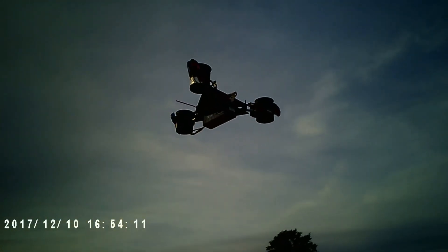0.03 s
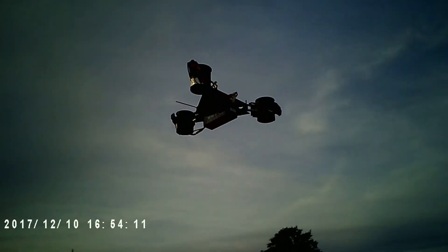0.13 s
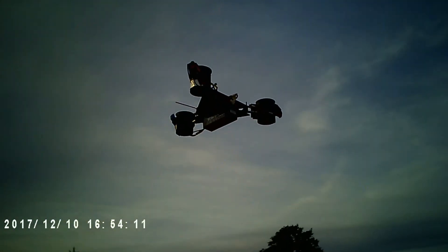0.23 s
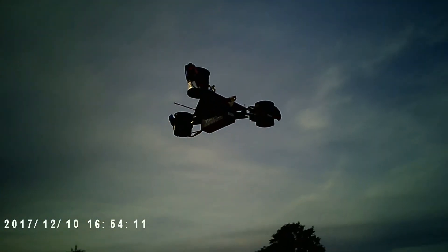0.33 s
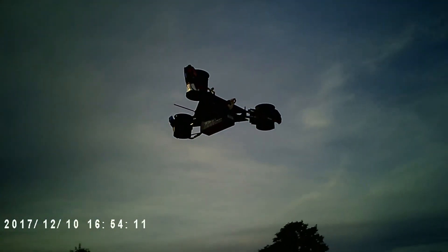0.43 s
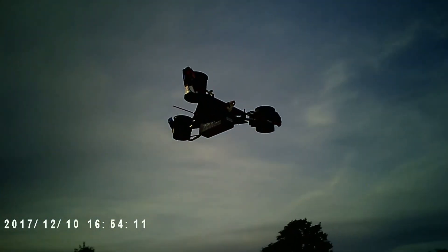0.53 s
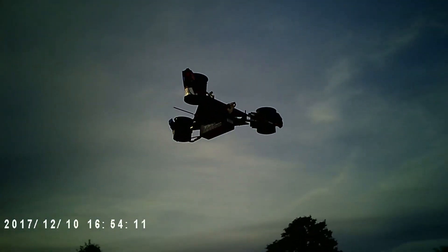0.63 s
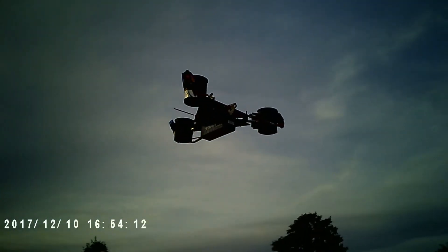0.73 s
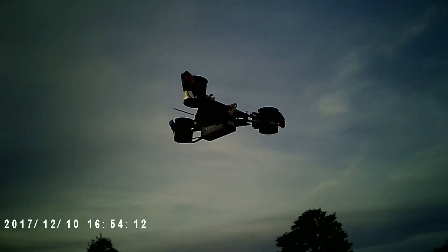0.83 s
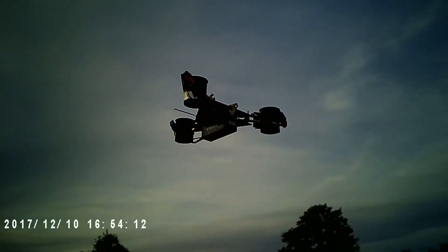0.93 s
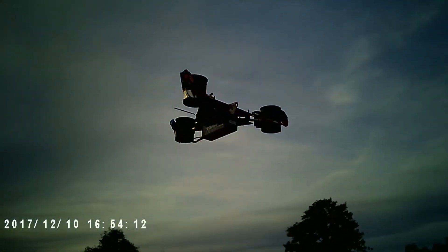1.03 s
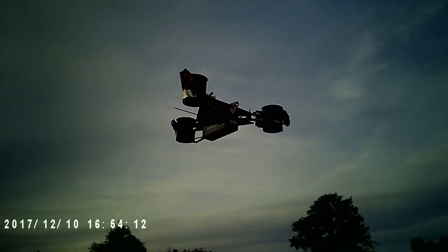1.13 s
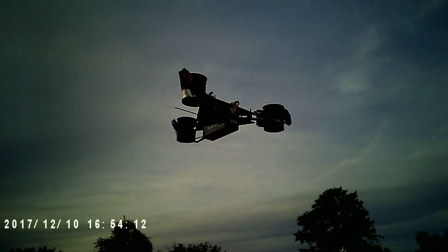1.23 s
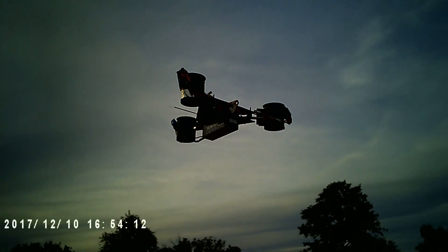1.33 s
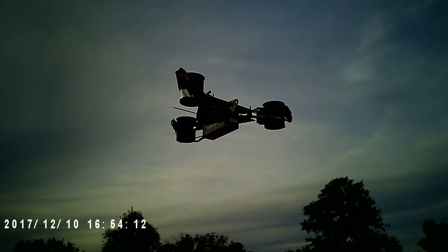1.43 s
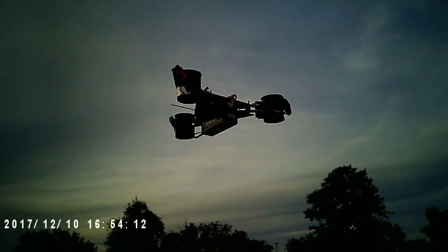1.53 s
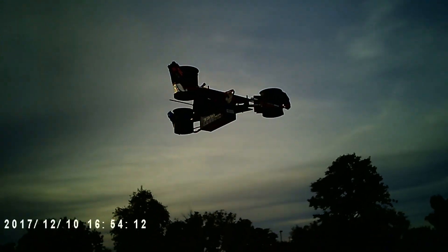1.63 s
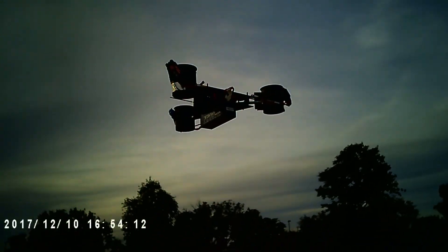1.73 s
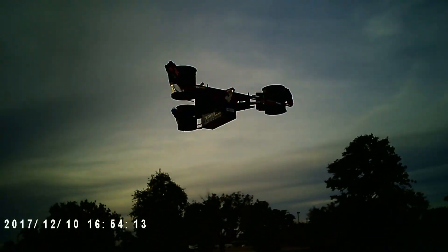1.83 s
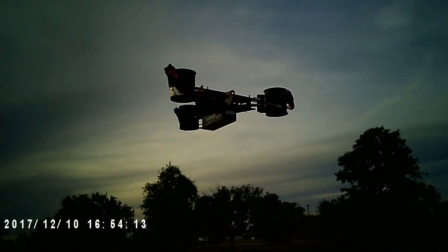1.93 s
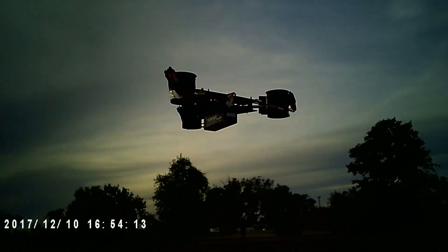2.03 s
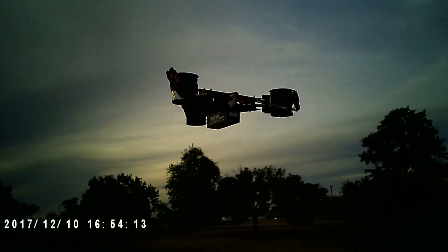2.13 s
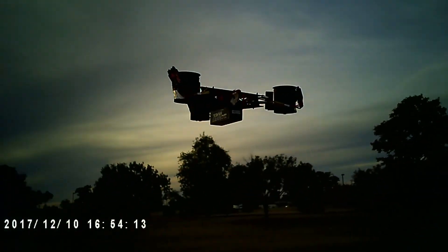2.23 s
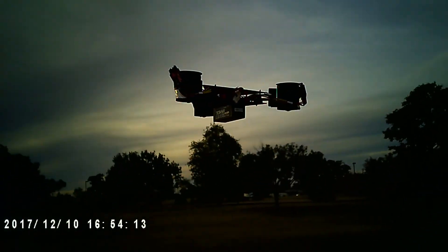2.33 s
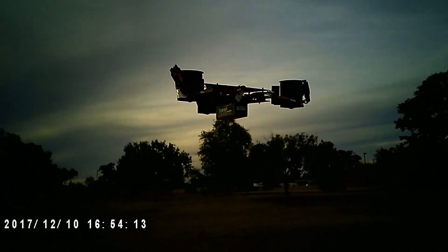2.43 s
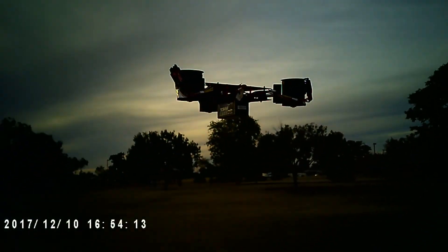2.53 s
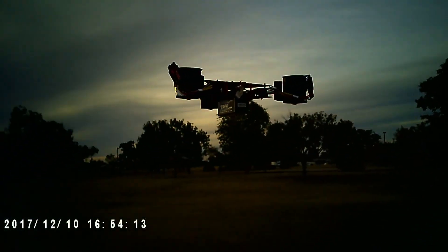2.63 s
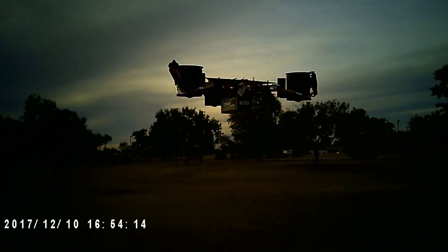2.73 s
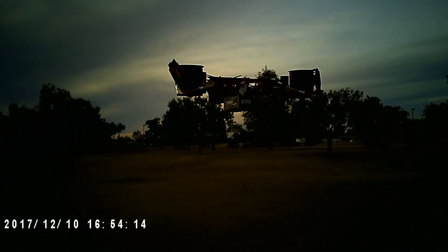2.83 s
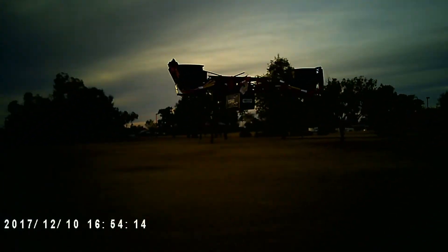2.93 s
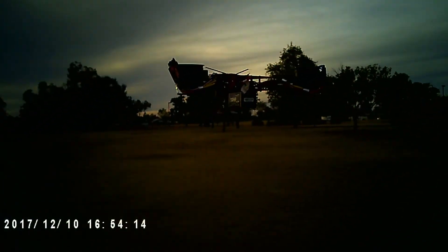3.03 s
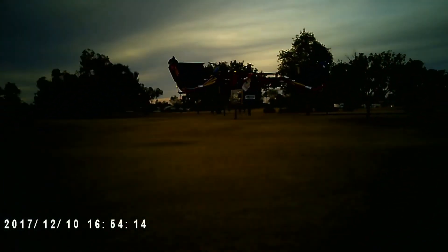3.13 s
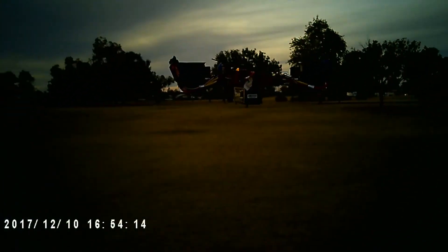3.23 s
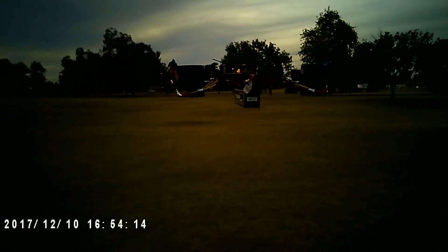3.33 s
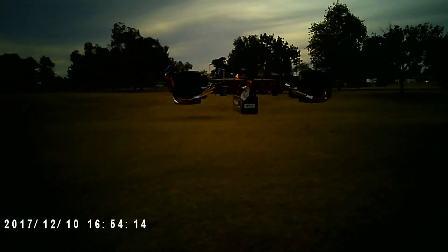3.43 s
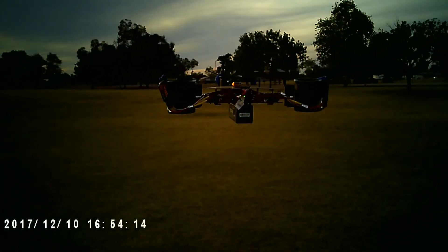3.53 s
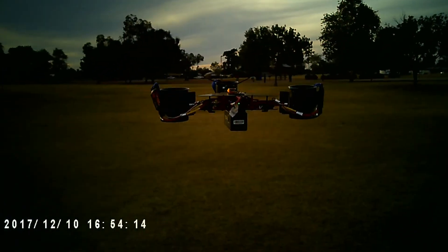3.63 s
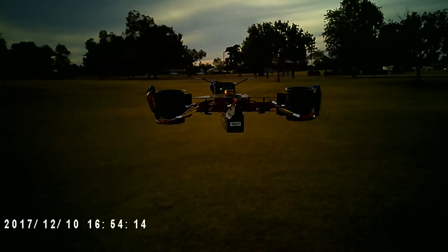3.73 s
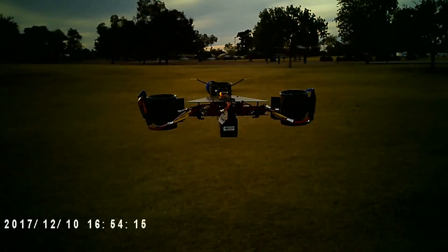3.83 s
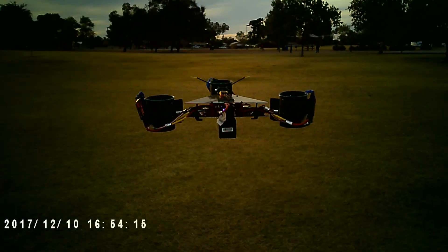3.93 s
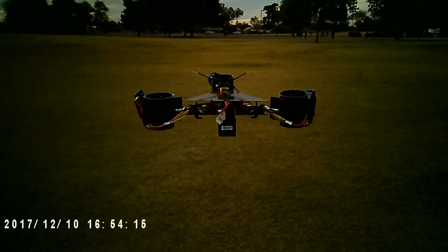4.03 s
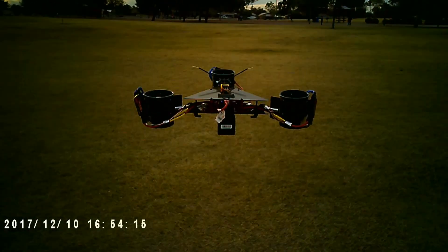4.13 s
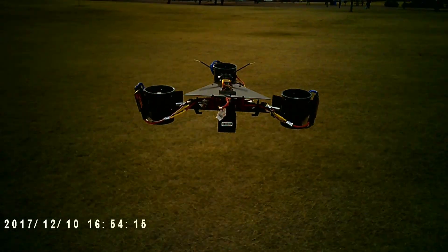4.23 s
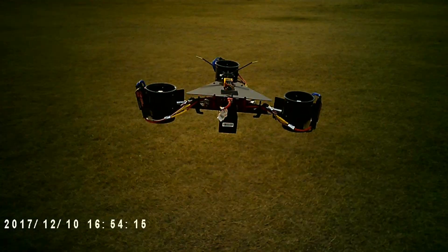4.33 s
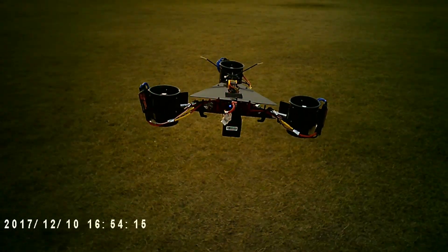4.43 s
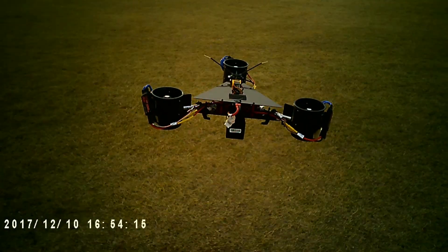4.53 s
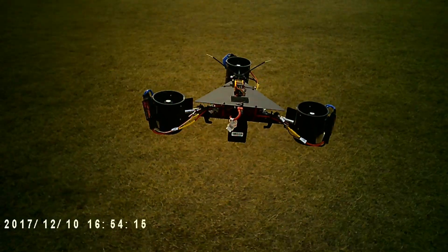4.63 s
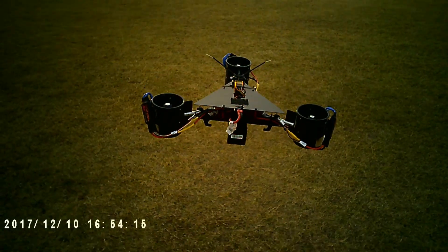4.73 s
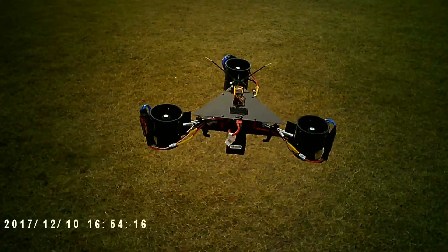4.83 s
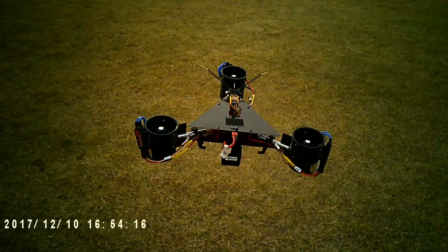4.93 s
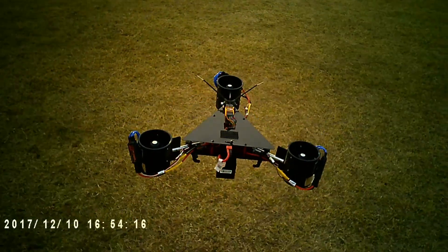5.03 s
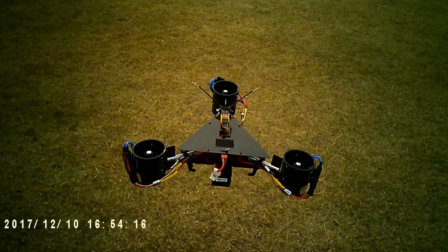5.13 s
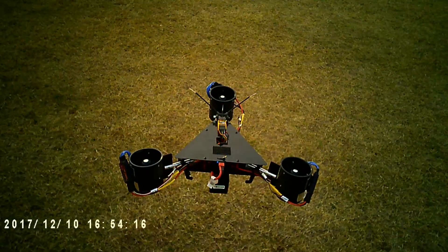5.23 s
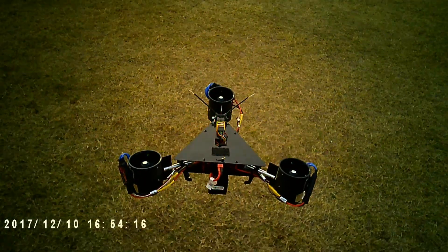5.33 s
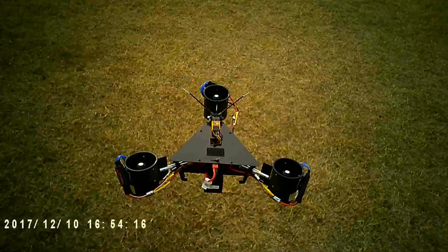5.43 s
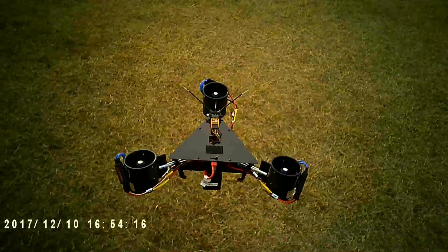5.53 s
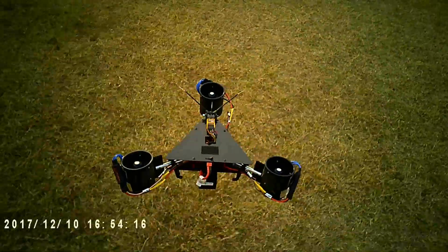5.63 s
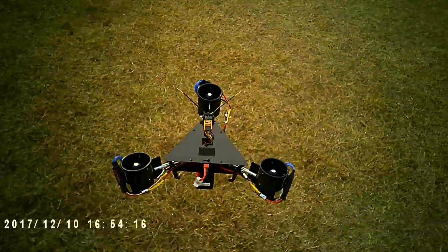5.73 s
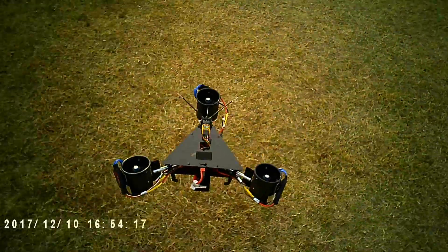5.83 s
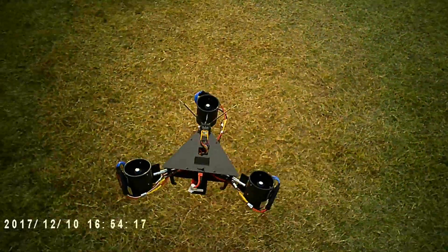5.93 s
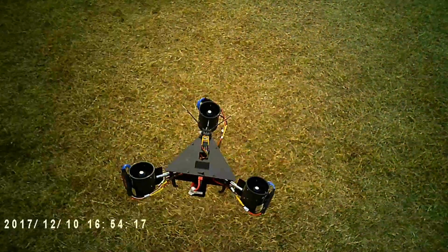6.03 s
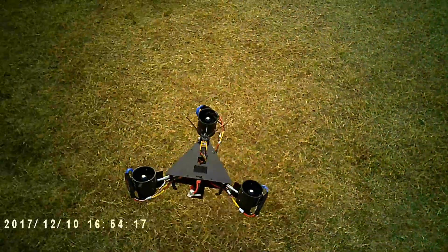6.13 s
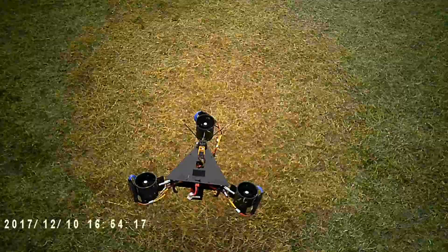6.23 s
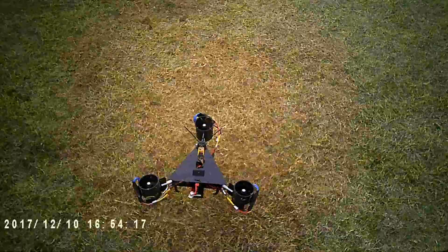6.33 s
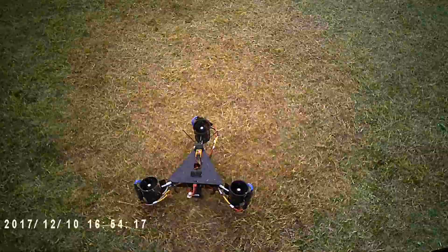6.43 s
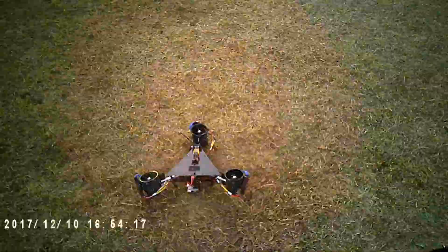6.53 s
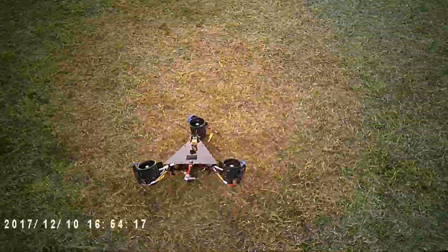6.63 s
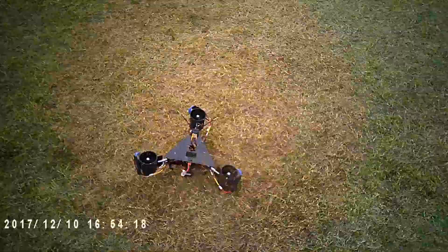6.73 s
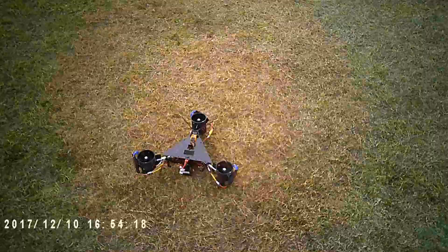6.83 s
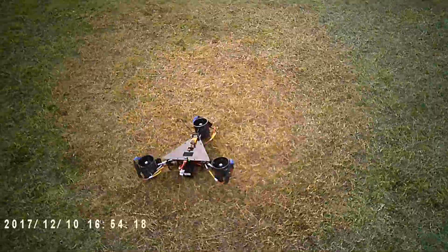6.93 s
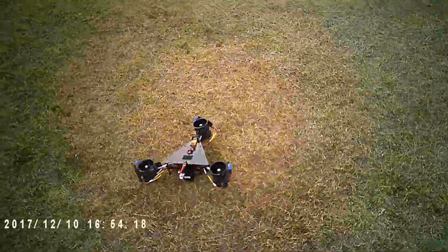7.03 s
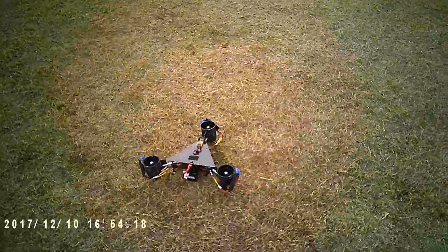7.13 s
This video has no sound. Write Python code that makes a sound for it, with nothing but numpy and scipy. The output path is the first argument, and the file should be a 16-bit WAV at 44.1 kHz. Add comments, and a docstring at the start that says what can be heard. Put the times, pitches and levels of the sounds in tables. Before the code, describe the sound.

Piercing, beating whine and hiss of three ducted fans in flight, an abrupt touchdown clatter, a fast falling whine, faint creaks, rustle and wind.

```python
"""Ducted-fan craft landing on a lawn

A small craft on three five-bladed ducted fans sinks, touches down and cuts its motors. Blade and shaft
tones, rough sines locked to three shaft speeds, beat over jets of shaped noise with a ground echo. Two
controllers whistle near 8 kHz; low noise is wind on the microphone. Noise bursts through resonances make
the landing knocks, ticks and rustle; short tones, steady for motor blips, mostly gliding for creaks."""
import sys
import numpy as np
from scipy import signal
from scipy.fft import rfft, irfft, next_fast_len
from scipy.io import wavfile

SR = 44100
rng = np.random.default_rng(int(sys.argv[2]) if len(sys.argv) > 2 else 0)


def volts_from_decibels(level):
    """Turn decibel levels (scalar or array-like) into linear amplitude factors."""
    exponent = np.asarray(level, float) / 20
    return 10 ** exponent


def inscribe(sig):
    """Save sig as 16-bit PCM at rate SR to the path in sys.argv[1].

    A 1-D sig is mono; a 2-D sig holds one channel per row.
    Samples are clipped to [-1, 1] before scaling.
    """
    pcm = np.round(np.clip(np.atleast_2d(sig).T, -1, 1) * 32767)
    wavfile.write(sys.argv[1], SR, pcm.astype(np.int16))


N = 317071
TIME = np.arange(N) / SR

# Trim about hover speed; at touchdown B is braked by the grass and C races.
# Each row: time in seconds, turns per second of fan A, B, C before stumbles and coasting.
SHAFT_SPEED = [(0, 602.5, 599, 598.8), (.15, 608.5, 602.8, 594.2), (.4, 603, 601.5, 600.3),
               (1.12, 603.5, 598.5, 603), (1.37, 604, 594.5, 604), (1.58, 593.5, 600.3, 613),
               (1.75, 596, 596, 610), (2.0, 604.5, 596, 606.5), (2.3, 601, 601, 606),
               (3.0, 602.5, 598, 605), (3.55, 599.5, 600, 604.5), (4.12, 600, 602, 601.5),
               (4.38, 589, 615.5, 603.5), (4.65, 593.5, 611, 600.5), (4.8, 594, 614, 595.5),
               (5.1, 595.5, 604, 600), (5.45, 600.5, 597.5, 603), (5.65, 601, 601, 607.5),
               (5.88, 596, 608, 608), (6.05, 592, 616, 592), (6.3, 572.8, 607, 616), (6.42, 567, 604, 614),
               (6.49, 573, 593, 615), (6.515, 582, 540, 664), (6.555, 594, 445, 666), (6.6, 591, 405, 636),
               (6.655, 586, 388, 580)]
# Stumbles of fan C. Each row: time in seconds, turns per second lost at once.
STUMBLES = [(.82, 8), (1.335, 42), (1.605, 40), (1.895, 6), (3.555, 11), (3.895, 8), (4.505, 8),
            (5.885, 12)]
STUMBLE_RECOVER_S = .065
BLIP_OVER_TURNS_PER_S, BLIP_S, BLIP_HZ, BLIP_DB = 11.5, 0.061, 677, -43.5
TOUCH_S, CUT_S, COAST_S, SLOW_TURNS_PER_S = 6.51, 6.655, .255, 130

# The beam of each duct sweeps past the listener.
# Each row: time in seconds, blade tone in dB of fan A, B, C before roughness and coasting.
BLADE_TONE = [(0, -42, -23.5, -38.5), (.75, -34.5, -29, -35), (1.2, -41, -27, -38.5),
              (2.0, -35, -28.5, -30), (2.5, -30.5, -23.5, -35.5), (3.0, -31, -21, -43),
              (3.4, -18.5, -23.5, -33), (4.0, -27.5, -16.5, -22.5), (4.5, -19.5, -29, -28),
              (4.8, -41, -38, -30), (5.2, -35.5, -32.5, -21.5), (5.9, -32.5, -38.5, -47),
              (6.4, -33, -33, -36), (6.49, -27, -34.5, -48), (6.53, -39, -52, -51), (6.58, -28.5, -41, -39),
              (6.66, -36, -52, -35)]
# Rotor imbalance. Each row: time in seconds, once-a-turn tone in dB of fan A, B, C before coasting.
IMBALANCE = [(0, -62, -47, -62), (4.1, -62, -49, -62), (4.6, -50, -49, -62), (5.5, -58, -45, -62),
             (6.2, -52, -51, -62), (6.47, -60, -62, -62), (6.55, -56, -75, -50), (6.65, -60, -75, -50)]
# Other multiples of the shaft speed.
# Each row: multiple, dB over the power level, dB change in fully gusty inflow.
SHAFT_ORDERS = [(4, -13, 0), (6, -21.5, -0.5), (7, -21.5, -6), (8, -17, -10), (9, -10.5, -5.5),
                (10, -7, -7.5), (11, -23, -9), (12, -16, -8), (14, -13, -10), (15, -9.5, 5.5), (17, -26, 6),
                (18, -27.5, -6), (20, -19.5, -4), (25, -29, -5)]
BLADES = 5
ORDERS_FOLLOW_BEAM = .35  # share of a fan's blade-tone lead in dB
# Exponents of the remaining speed while coasting, for amplitudes.
BLADE_POWER, IMBALANCE_POWER, ROAR_POWER, TREBLE_POWER = 5.5, 0.85, 2.22, 0.67
# The imbalance tone dies out as the frame comes to rest.
IMBALANCE_STOP_S, IMBALANCE_FADE_S = 6.97, .08

# Jets before coasting. Each row: time in seconds, power level in dB, treble tilt in dB before a fixed lift.
JETS = [(0, -40.5, -2.5), (1.2, -39, -4.5), (2.4, -37.5, -7.5), (3.9, -34.5, -8.5), (4.4, -35, -5),
        (4.9, -35, -4), (5.4, -35.5, -2), (5.9, -38.5, 0), (6.4, -37, -0.5), (6.65, -37.5, -2.5)]
# Jet spectrum shape. Each row: frequency in Hz, relative density in dB per Hz.
JET_SPECTRUM = [(100, -44), (250, -29), (700, -24), (1500, -1.5), (2200, -3.5), (2900, 5), (3400, -8),
                (6000, -5.5), (9000, -5), (11000, -16.5), (15600, -29.5)]
# Fixed humps and dips in the colour of the rush. Each row: centre in Hz, width in Hz, gain in dB.
RUSH_BUMPS = [(3400, 500, -6), (4450, 500, -4), (6250, 400, -8), (7600, 500, -4), (11200, 500, -5),
              (13100, 1000, 6)]
# Ground echo. Each row: time in seconds, first hump in Hz, amplitude share of the copy.
GROUND_ECHO = [(0, 1126, 0.19), (1.9, 1186, 0.18), (2.5, 1363, 0.35), (3.1, 1330, 0.2), (3.9, 1605, 0.31),
               (4.4, 1696, 0.34), (5.1, 2107, 0.46), (5.7, 2240, 0.17), (6.3, 2960, 0.32)]
# Inflow unsteadiness rises with the echo hump: calm at the first pitch, fully gusty at the second.
CALM_HUMP_HZ, GUSTY_HUMP_HZ = 1015, 3407

# Controller switching. Each row: time in seconds, upper whistle in Hz.
WHISTLE_PITCH = [(0, 8012), (4.5, 8011), (5.5, 8004), (6.1, 7987), (6.7, 7990)]
# Each row: time in seconds, level of the pair in dB, lower whistle in dB relative to the upper.
WHISTLE_LEVEL = [(0, -41, -30), (2, -39, 3), (2.7, -43, -10), (3.1, -35, 0), (3.6, -28, -4.5),
                 (4.1, -41.5, -13), (4.5, -31.5, -19), (5.2, -28, -8), (5.8, -31.5, -14), (6.3, -41.5, 10),
                 (6.7, -39, -22)]
WHISTLE_GAP_HZ, WHISTLE_OFF_S = 31, 6.715

# Microphone rumble shape. Each row: frequency in Hz, relative density in dB per Hz.
RUMBLE_SPECTRUM = [(15, 2), (45, -5.5), (68, 3.5), (100, -7), (200, -23.5), (400, -67), (900, -80)]
# Gusts. Each row: centre in seconds, spread in seconds, dB over the breeze before lumps.
GUSTS = [(4.72, 0.069, 3.1), (4.95, 0.078, 3.8), (5.37, 0.046, 2.8), (6.88, 0.036, 1.6),
         (7.039, 0.075, 2.4)]
BREEZE_DB, GUST_LUMPS_DB, GUST_TOP_HZ = -51.5, 3.0, 120

# Far background shape. Each row: frequency in Hz, relative density in dB per Hz.
PARK_SPECTRUM = [(100, -3), (300, -5), (900, 3), (2500, -15.5), (5000, -45), (15600, -23)]
# Far drones. Each row: frequency in Hz, level in dB.
DRONES = [(60, -90), (73.3, -61.5)]

# Landing blows. Each row: time in seconds, burst onset in dB before the resonances.
TOUCHDOWN = [(6.49, -12.5), (6.498, -18.5), (6.508, -11.5), (6.518, -25), (6.755, -22)]
# Frame resonances. Each row: centre in Hz, width in Hz, gain in dB.
FRAME_RING = [(1300, 550, -12), (2084, 300, 7.5), (2860, 320, -22), (5000, 3000, -26)]
# Orders of the slowing motor.
# Each row: shaft multiple, level at its loudest in dB, time of that in seconds, spread in seconds.
COGGING = [(5, -55, 6.92, .03), (10, -46, 6.67, .06), (15, -43, 6.62, .1), (20, -52, 6.66, 0.16),
           (25, -60, 6.8, .08), (13, -58, 7.11, .07), (32, -71, 7.12, .07)]
# Creaks of the settling frame.
# Each row: start in seconds, length in seconds, start in Hz, end in Hz, peak in dB.
CREAKS = [(6.743, 0.032, 1250, 1040, -42), (6.787, 0.058, 837, 1060, -40.5), (6.965, 0.052, 850, 830, -45)]
# Rustle resonances. Each row: centre in Hz, width in Hz, gain in dB.
RUSTLE_RING = [(940, 560, -11), (1430, 440, -6), (2100, 230, -1)]
RUSTLE_START_S, RUSTLE_DECAY_S, RUSTLE_SNAPS_PER_S = 6.75, .25, 900
RUSTLE_FLOOR_DB = -41  # smallest snap at the start, before the resonances
# Grass and rotor ticks. Each row: time in seconds, burst onset in dB before the resonances.
TICKS = [(6.9493, -30.5), (6.9731, -40.5), (7.001, -43), (7.0464, -45), (7.0825, -46), (7.103, -49),
         (7.1691, -47)]
# Tick resonances. Each row: centre in Hz, width in Hz, gain in dB.
TICK_RING = [(5600, 540, 8), (8150, 2600, 2.5), (10000, 1500, -4)]


def rms_one(x):
    """Scales to rms 1."""
    return x / np.sqrt(np.mean(x ** 2) + 1e-20)


def in_time(rows):
    """Interpolates the columns of a curve at every sample."""
    s, *columns = np.transpose(rows)
    return [np.interp(TIME, s, column) for column in columns]


def drift(rate_hz):
    """Slow chance: twice low-passed noise at every 40th sample, spread 1."""
    r = np.exp(-80 * np.pi * rate_hz / SR)
    noise = rng.standard_normal(N // 40 + 2002)
    slow = signal.lfilter([1], [1, -2 * r, r * r], noise)[2000:]  # drops the run-in
    return np.interp(np.arange(N) / 40, np.arange(len(slow)), rms_one(slow))


def coloured_noise(spectrum, bumps=()):
    """Noise of rms 1 with a spectrum in dB per Hz plus bell-shaped bumps and dips."""
    size = next_fast_len(N)
    hz = np.arange(size // 2 + 1) * SR / size + 1
    corner_hz, corner_db = np.transpose(spectrum)
    shape_db = np.interp(np.log(hz), np.log(corner_hz), corner_db)
    for centre_hz, width_hz, db in bumps:
        shape_db += db * np.exp(-(2 * (hz - centre_hz) / width_hz) ** 2)
    return rms_one(irfft(rfft(rng.standard_normal(size)) * volts_from_decibels(shape_db), size)[:N])


def rough_tone(phase, rough, rate_hz):
    """A sine, rms 1 before turbulence shakes its height and phase."""
    turn = phase + 2 * np.pi * rng.random()
    in_phase = (1 + rough * drift(rate_hz)) * np.sin(turn)
    quadrature = rough * drift(rate_hz) * np.cos(turn)
    return np.sqrt(2) * (in_phase + quadrature)


def short_tones(events):
    """Short tones, steady or gliding, under a smooth hump, their phase slightly shaken."""
    out, shake = np.zeros(N), .6 * drift(40.)
    for s, length_s, start_hz, end_hz, db in events:
        at, size = round(s * SR), round(length_s * SR)
        phase = 2 * np.pi * np.cumsum(np.linspace(start_hz, end_hz, size)) / SR
        out[at:at + size] += volts_from_decibels(db) * np.hanning(size) * np.sin(phase + shake[at:at + size])
    return out


def knocks(events, body, decay_s):
    """Dying noise bursts excite the broad resonances of a body."""
    clicks, out = np.zeros(N), 0
    s, db = np.transpose(events)
    clicks[np.round(s * SR).astype(int)] = volts_from_decibels(db)
    envelope = signal.lfilter([1], [1, -np.exp(-1 / (decay_s * SR))], clicks + 1e-18)
    bursts = envelope * rng.standard_normal(N)
    for hz, width_hz, gain_db in body:
        r = np.exp(-np.pi * width_hz / SR)
        poles = [1, -2 * r * np.cos(2 * np.pi * hz / SR), r * r]
        out = out + volts_from_decibels(gain_db) * signal.lfilter([1 - r, 0, r - 1], poles, bursts)
    return signal.sosfilt(signal.butter(2, 11500, "low", fs=SR, output="sos"), out)


def coast(cut_turns):
    """Share of the speed at the power cut left as a rotor decays towards a slow spin."""
    slow = SLOW_TURNS_PER_S / cut_turns
    return slow + (1 - slow) * np.exp(-np.maximum(TIME - CUT_S, 0) / COAST_S)


def speeds():
    """Turns per second of the three shafts: trim, stumbles with recovery, coasting."""
    a, b, c = in_time(SHAFT_SPEED)
    for s, lost in STUMBLES:
        c = c - lost * (TIME > s) * np.exp(-np.abs(TIME - s) / STUMBLE_RECOVER_S)
    return [turns * coast(turns[-1]) for turns in (a, b, c)]


def fan(turns, blade_db, imbalance_db, order_db, gusty):
    """Blade tone with a noisy skirt plus imbalance tone; separately, weaker shaft orders in flight."""
    speed = turns + 2.2 * gusty * drift(12.)  # jitter blurs the high orders most
    shaft = 2 * np.pi * np.cumsum(speed) / SR
    left = np.where(TIME > CUT_S, turns / turns[round(CUT_S * SR)], 1)  # share of speed
    skirt = 1.12 * gusty * drift(137.0) * np.cos(BLADES * shaft)
    blade = rough_tone(BLADES * shaft, 1.36 * gusty * left ** 4, 6.2) + skirt
    imbalance = rough_tone(shaft, 0.36, 2.8)
    orders = 0
    for k, db, gust_db in SHAFT_ORDERS:
        level_db = db + gust_db * gusty + 3.44 * drift(0.89)
        orders = orders + volts_from_decibels(level_db) * rough_tone(round(k) * shaft, 0.24, 13.0)
    flying = np.clip((TOUCH_S - TIME) / .02, 0, 1)
    resting = np.clip((IMBALANCE_STOP_S - TIME) / IMBALANCE_FADE_S, 0, 1)
    tones = volts_from_decibels(blade_db) * left ** BLADE_POWER * blade
    tones = tones + volts_from_decibels(imbalance_db) * left ** IMBALANCE_POWER * resting * imbalance
    return tones, volts_from_decibels(order_db) * flying * orders


def jets(power_db, gusty):
    """Turbulent rush of the three jets; near the lawn the downwash adds a low wash."""
    band = signal.butter(1, [180, 700], "band", fs=SR, output="sos")
    wash = signal.sosfilt(band, rng.standard_normal(N))
    return volts_from_decibels(power_db + 5.5) * (coloured_noise(JET_SPECTRUM, RUSH_BUMPS) + 0.64 * gusty ** 2 * wash)


def tilt(x, treble_db):
    """The treble swells as the ducts turn towards the listener; the very top follows less."""
    treble = signal.sosfilt(signal.butter(1, [3500, 13000], "band", fs=SR, output="sos"), x)
    return x - treble + volts_from_decibels(treble_db + 3.0) * treble


def ground_echo(x):
    """The lawn returns a dull copy; its lag shrinks overall in the descent and the humps rise."""
    hump_hz, share = in_time(GROUND_ECHO)
    late = np.interp(np.arange(N) - SR / hump_hz, np.arange(N), x)
    return x + share * signal.sosfilt(signal.butter(1, 9000, "low", fs=SR, output="sos"), late)


def whistle():
    """Two controllers switch at slightly different rates and beat, until soon after the power cut."""
    level_db, lower_db = in_time(WHISTLE_LEVEL)
    upper = 2 * np.pi * np.cumsum(in_time(WHISTLE_PITCH)[0]) / SR
    lower = upper - 2 * np.pi * WHISTLE_GAP_HZ * TIME
    pair = rough_tone(upper, 0.14, 9.9) + volts_from_decibels(lower_db) * rough_tone(lower, 0.11, 7.1)
    powered = np.clip((WHISTLE_OFF_S - TIME) * 100, 0, 1)
    return volts_from_decibels(level_db) * powered * pair / np.sqrt(1 + volts_from_decibels(2 * lower_db))


def wind():
    """Steady rumble on the microphone; lumpy gusts add low buffeting."""
    gust = sum(volts_from_decibels(db) * np.exp(-((TIME - s) / spread_s) ** 2) for s, spread_s, db in GUSTS)
    gust = gust * volts_from_decibels(GUST_LUMPS_DB * drift(9.0))
    band = signal.butter(2, [18, GUST_TOP_HZ], "band", fs=SR, output="sos")
    buffet = rms_one(signal.sosfilt(band, rng.standard_normal(N)))
    return volts_from_decibels(BREEZE_DB) * (coloured_noise(RUMBLE_SPECTRUM) + gust * buffet)


def park():
    """Far background: steady shaped noise and slightly unsteady low drones."""
    drones = sum(volts_from_decibels(db) * rough_tone(2 * np.pi * hz * TIME, 0.14, 4.3) for hz, db in DRONES)
    return volts_from_decibels(-54.5) * coloured_noise(PARK_SPECTRUM) + drones


def motor_blips():
    """Each deep stumble of fan C gives a short steady-pitched blip."""
    deep = [s for s, lost in STUMBLES if lost > BLIP_OVER_TURNS_PER_S]
    return short_tones([(s - BLIP_S / 4, BLIP_S, BLIP_HZ, BLIP_HZ, BLIP_DB) for s in deep])


def touchdown():
    """Landing blows ring the broad resonances of the frame."""
    return knocks(TOUCHDOWN, FRAME_RING, 0.0097)


def cogging(turns):
    """After touchdown one motor whines as it slows; each order swells for a moment."""
    shaft = 2 * np.pi * np.cumsum(turns) / SR
    out = 0
    for k, db, s, spread_s in COGGING:
        swell = np.exp(-((TIME - s) / spread_s) ** 2) * (TIME > TOUCH_S)
        out = out + volts_from_decibels(db) * swell * rough_tone(round(k) * shaft, 0.93, 26.0)
    return out


def creaks():
    """The settling frame creaks in short, mostly gliding tones."""
    return short_tones(CREAKS)


def rustle():
    """The frame rustles on the grass after it rocks back: random uneven snaps that die away."""
    wait, size = rng.exponential(1, (320, 2)).T
    after_s = np.cumsum(wait) / RUSTLE_SNAPS_PER_S
    fall_db = 20 * np.log10(np.e) * after_s / RUSTLE_DECAY_S
    snaps = np.transpose([RUSTLE_START_S + after_s, RUSTLE_FLOOR_DB + 2.4 * size - fall_db])
    return knocks(snaps[snaps[:, 0] < TIME[-1]], RUSTLE_RING, 0.0037)


def ticks():
    """Grass and rotor ticks: very short bursts through high resonances."""
    return knocks(TICKS, TICK_RING, 0.0029)


def scene():
    """Fans, jets, controllers, wind, background and landing in one channel."""
    turns = speeds()
    slowing_db = 20 * np.log10(coast(SHAFT_SPEED[-1][1]))
    power_db, treble_db = in_time(JETS)
    power_db = power_db + ROAR_POWER * slowing_db
    treble_db = treble_db + TREBLE_POWER * slowing_db
    hump_hz = in_time(GROUND_ECHO)[0]
    gusty = np.clip((hump_hz - CALM_HUMP_HZ) / (GUSTY_HUMP_HZ - CALM_HUMP_HZ), 0, 1)
    beams_db = np.array(in_time(BLADE_TONE))
    mean_db = beams_db.mean(axis=0)
    tones, orders = 0, 0
    for speed, blade_db, imbalance_db in zip(turns, beams_db, in_time(IMBALANCE)):
        order_db = power_db + ORDERS_FOLLOW_BEAM * (blade_db - mean_db)
        fan_tones, fan_orders = fan(speed, blade_db, imbalance_db, order_db, gusty)
        tones, orders = tones + fan_tones, orders + fan_orders
    echoed = ground_echo(tilt(jets(power_db, gusty) + orders, treble_db))
    craft = tones + echoed + whistle() + motor_blips() + cogging(turns[2])
    landing = touchdown() + creaks() + rustle() + ticks()
    return (craft + wind() + park() + landing)[None]


def band_limit(x):
    """A steep low-pass at the top of the band."""
    return signal.sosfilt(signal.butter(12, 15640, fs=SR, output="sos"), x)


def record(dry):
    """Adds a small offset from zero that sags as the motors stop, then partly returns."""
    offset = np.interp(TIME, [6.6, 6.85, 7.19], [.018, .003, .009])
    return band_limit(dry + offset)


dry = scene()
out = record(dry)
inscribe(out)
```